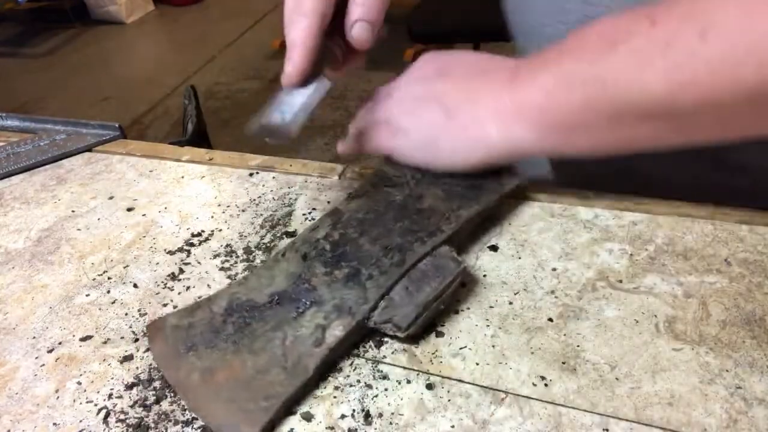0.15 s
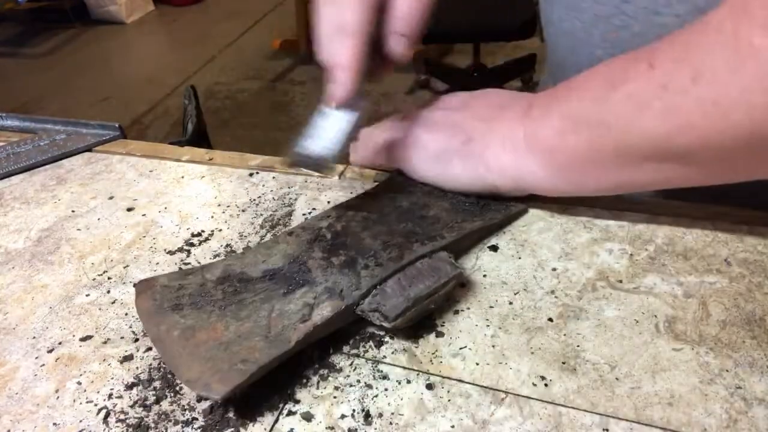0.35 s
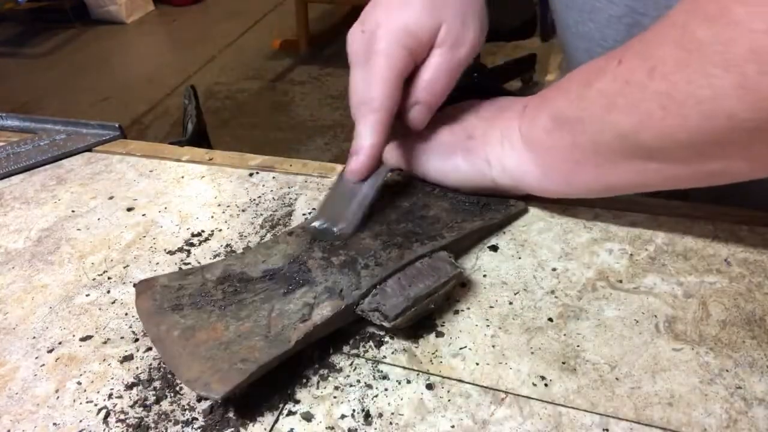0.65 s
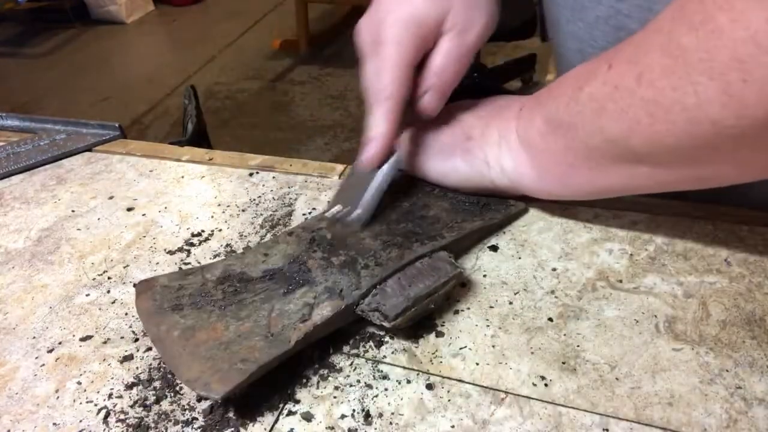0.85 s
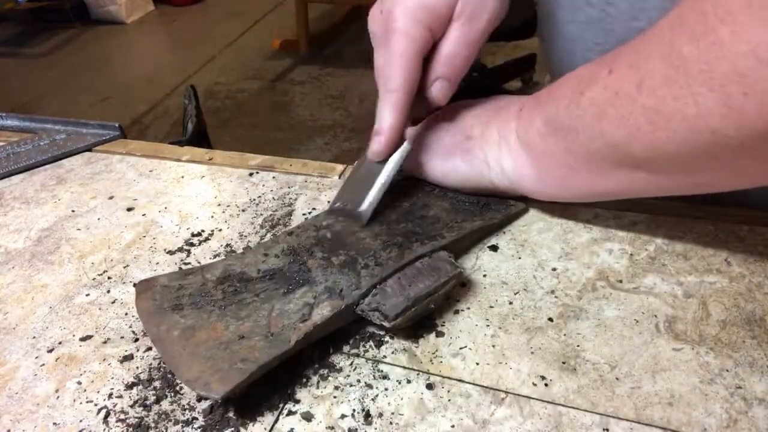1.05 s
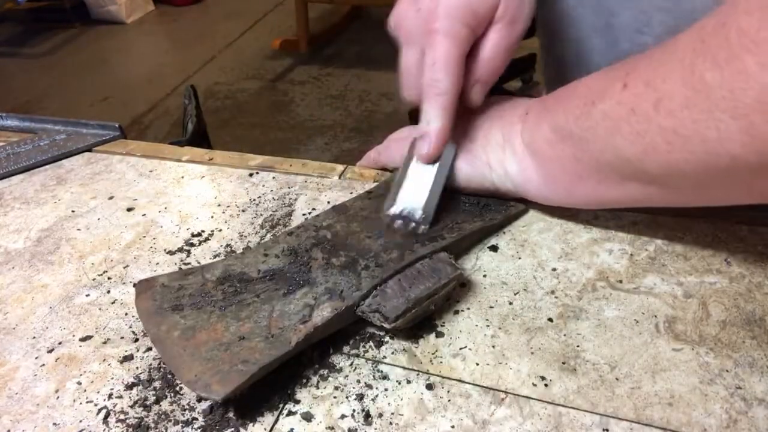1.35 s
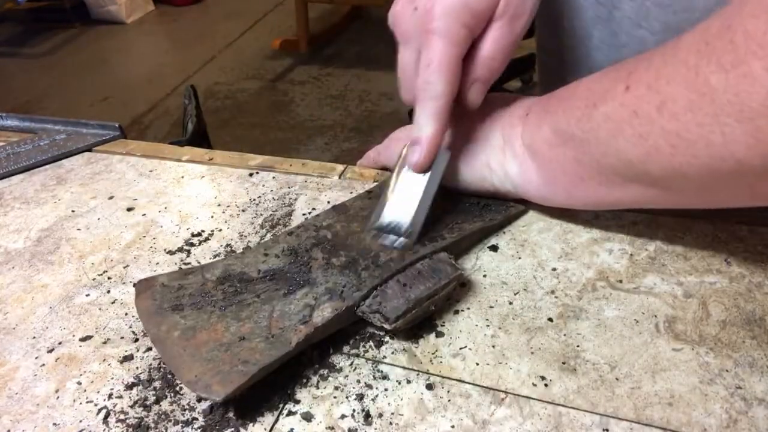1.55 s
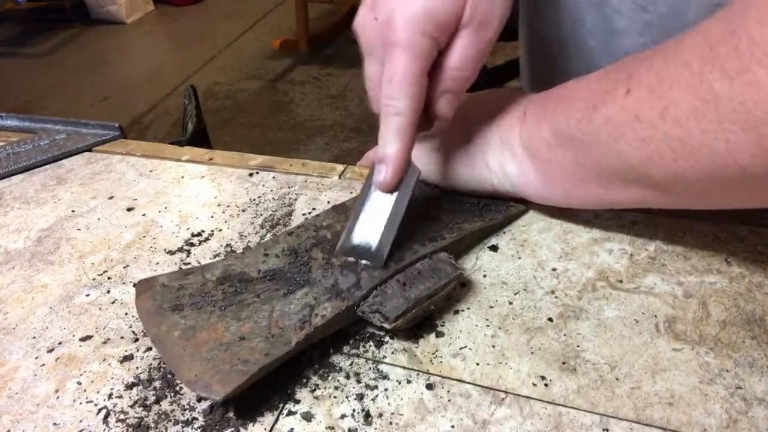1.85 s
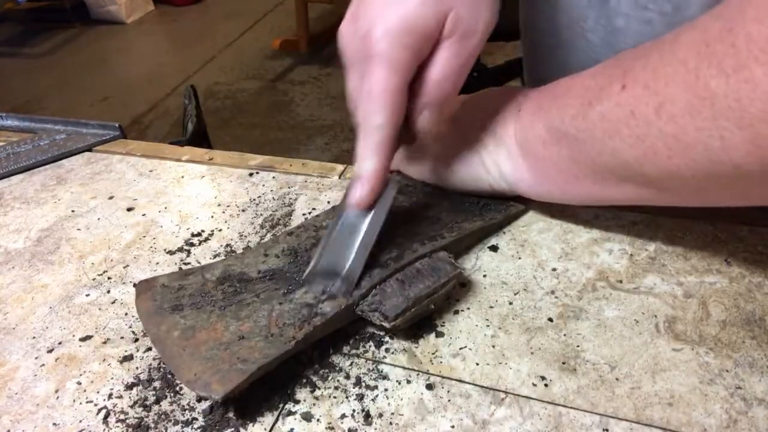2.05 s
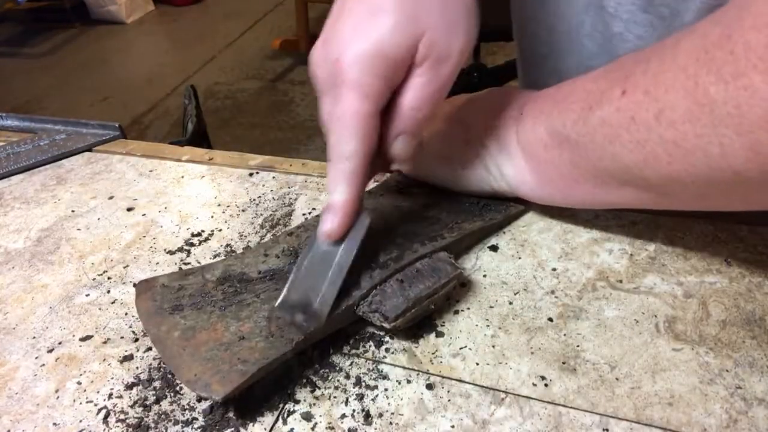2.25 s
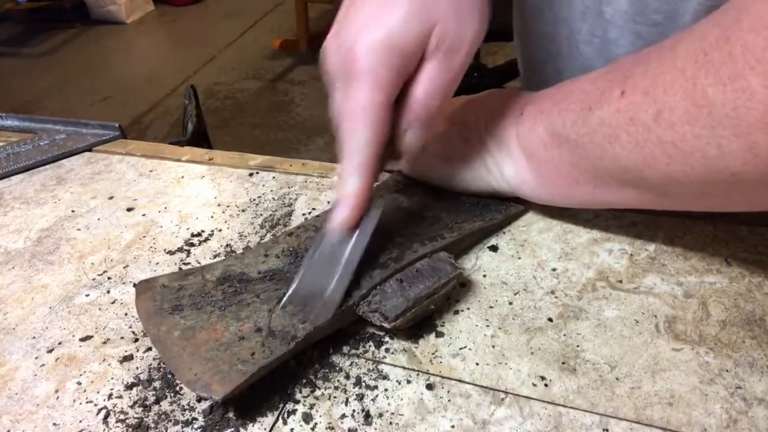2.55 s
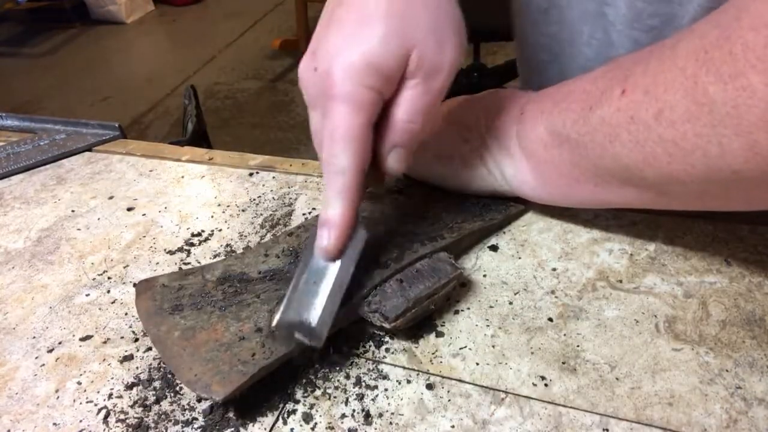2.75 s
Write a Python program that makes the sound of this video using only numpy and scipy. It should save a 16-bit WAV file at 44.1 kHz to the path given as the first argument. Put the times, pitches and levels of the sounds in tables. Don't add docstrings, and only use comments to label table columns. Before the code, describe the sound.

A steel chisel scrapes gritty hardened asphalt off an axe head in short, crunching strokes

```python
import sys
import numpy as np
from scipy import signal
from scipy.fft import rfft, irfft, next_fast_len
from scipy.io import wavfile
from scipy.ndimage import uniform_filter1d, map_coordinates

SR = 44100
rng = np.random.default_rng(int(sys.argv[2]) if len(sys.argv) > 2 else 0)


def generate_wav(sig):
    pcm = np.round(np.clip(np.atleast_2d(sig).T, -1, 1) * 32767).astype(np.int16)
    wavfile.write(sys.argv[1], SR, pcm)


def volts_from_decibels(level):
    exponent = np.asarray(level, float) / 20
    return 10 ** exponent


N = 127890
T = np.arange(N) / SR

# start_s, length_s, level_db, swell_db over the stroke, brightness_db
STROKES = [(0.217, 0.02, -58, -10, 6), (0.49, 0.0067, -77, -6, -20), (0.522, 0.074, -43, 7, -1),
           (0.68, 0.055, -51.5, 3.5, 0.5), (0.805, 0.068, -40.5, -2.5, 0.5), (0.935, 0.067, -49.5, -1, 3.5),
           (1.06, 0.081, -45, -4.5, 0.5), (1.213, 0.047, -37.5, -4.5, -1), (1.407, 0.083, -63, 14, -9),
           (1.332, 0.053, -32.5, 1.5, 2), (1.479, 0.027, -45, -6, 6.5), (1.571, 0.042, -36, 9, 0),
           (1.623, 0.027, -41, 9.5, 0), (1.72, 0.046, -52, 2.5, 4), (1.836, .025, -49, -1, 1.5),
           (1.869, 0.043, -39, -1.5, 1), (1.973, 0.056, -58, -5, 7.5), (2.094, 0.073, -40.5, 5, 1.5),
           (2.233, 0.05, -49, -18.5, 1.5), (2.269, 0.071, -57.5, 6, 7), (2.384, 0.03, -33, 1, 0),
           (2.493, 0.031, -37, 1, 2), (2.641, 0.038, -32.5, -4.5, -2.5), (2.758, 0.029, -37, 3.5, 0.5),
           (2.904, 0.028, -47, -10, 6)]
# time_s, place (0 thick poll, 1 eye, 2 thin cheek)
EDGE_PLACE = [
    (0, 0.092),
    (1.15, 0.38),
    (1.3, 1.4),
    (1.7, 0.67),
    (1.9, 1.68),
    (2.15, 1.62),
    (2.9, 1.9),
]
# pitch_hz, width_hz, level_db
POLL_MODES = [(1164, 92, -1.5), (1474, 93, 7), (1818, 51, 7), (2610, 270, 3), (3470, 160, 3),
              (3850, 120, 0), (4920, 350, -4), (5280, 39, 6), (7000, 4200, -11), (9900, 300, -8),
              (15000, 1300, -22)]
EYE_MODES = [(1196, 41, -1), (1510, 84, 7), (2405, 170, -2), (2816, 41, 6), (3092, 110, -2), (3486, 77, 10),
             (4070, 40, 8.5), (4447, 220, 6.5), (5170, 130, 1.5), (5310, 35, 9), (7140, 2130, -10),
             (9560, 470, -9.5), (11760, 1200, -21.5), (15700, 910, -14)]
CHEEK_MODES = [(1547, 150, 6), (1992, 72, 13.5), (2480, 110, 1.5), (3410, 170, 5), (3900, 190, 5.5),
               (4150, 210, 9), (4760, 310, -2.5), (5360, 46, 3.5), (7000, 4100, -11), (9040, 630, -6),
               (13100, 3600, -23)]
# freq_hz, density_db (per Hz)
CRUNCH_COLOUR = [(410, -53), (700, 2.5), (950, 1), (1420, 7.5), (2220, 0.5), (4610, 7), (5840, -28),
                 (7110, -35), (16000, -66)]
# pitch_hz, width_hz, level_db
PLANK_MODES = [(262, 54, -3.5), (444.7, 40, 1), (524.4, 78, 2), (621, 109, 0.5)]

# start_s, length_s, level_db
SONGS = [(0.604, 0.037, -65), (0.692, 0.012, -49), (1.286, .02, -82), (1.08, 0.035, -85),
         (1.75, 0.015, -53), (1.9, 0.034, -56), (2.157, 0.034, -43), (2.2, 0.048, -60),
         (2.396, 0.029, -37.5), (2.484, 0.037, -47.5), (2.669, 0.024, -39.5), (2.75, 0.046, -53.5)]
# time_s, peak_db, treble_db
TICKS = [(0.2101, -14, -7), (0.216, -32, 19), (0.2458, -43.5, 29), (0.254, -29, -2), (0.4662, -9.5, -1),
         (0.574, -29, 11), (0.619, -45, 16), (.629, -45, 16), (.691, -37, 26), (.801, -42, 23),
         (0.9445, -24.5, 9), (1.056, -33.5, 15), (0.977, -37, 20), (1.153, -50, 11), (1.178, -40.5, 25),
         (1.321, -27, -9), (1.567, -30.5, 14), (1.867, -23, -7), (2.005, -39, 2), (2.123, -20.5, 10),
         (2.628, -31, 17), (2.745, -30, -5)]
# pitch_hz, level_db, t60_s
STEEL_MODES = [(467, -16, 0.03), (1848, -12, 0.04), (3460, -12, 0.02)]
# pitch_hz, width_hz, level_db
CLINK_MODES = [(1520, 780, -0.5), (2960, 2060, -1), (4450, 960, -0.5)]
TREBLE_MODES = [(6760, 2000, -11.5)]

# time_s, level_db
DROPS = [
    (0.2137, -7.5),
    (0.219, -11),
    (.233, -26),
    (0.256, -12.5),
    (0.286, -23.5),
    (0.313, -31),
]
# pitch_hz, level_db, t60_s
THUD_MODES = [(73.4, -5, 0.26), (113.3, -2.5, 0.19), (147, -2, 0.18), (192, -8.5, 0.08), (600, -17, 0.15),
              (760, -24.5, 0.16)]
# pitch_hz, width_hz, level_db
RATTLE_MODES = [(136, 74, 2.5), (318, 150, -43), (590, 57, -10.5), (805, 630, -22), (2140, 2700, -26.5)]
# peak_s, half_length_s, level_db
SHOVES = [(0.492, 0.0086, -37.5), (0.627, 0.01, -38), (0.717, 0.0067, -36.5), (0.877, 0.021, -35),
          (0.99, 0.019, -36), (1.145, 0.051, -40.5), (1.345, 0.074, -43), (1.491, 0.018, -35.5),
          (1.636, 0.013, -32), (1.723, 0.054, -38.5), (1.891, 0.014, -31.5), (1.963, 0.081, -39),
          (2.144, 0.016, -28), (2.252, 0.045, -39.5), (2.419, 0.047, -31.5), (2.55, 0.037, -39),
          (2.68, 0.015, -28), (2.76, 0.018, -49), (2.864, 0.095, -44)]
# pitch_hz, width_hz, level_db
FRAME_MODES = [(63.9, 12.6, 4), (110.9, 20.5, -0.5), (156.4, 12, -4.5), (217, 31, -19.5), (255.7, 62, -14)]
# time_s, level_db, pitch_hz
KNOCKS = [(0.565, -44, 498), (0.804, -57, 510), (.944, -51, 600), (.977, -40.5, 589), (1.189, -45, 553),
          (1.225, -44, 485), (1.248, -38, 590), (1.342, -63, 493), (1.483, -34.5, 465), (1.591, -39, 581),
          (1.614, -40, 600), (1.635, -33.5, 418), (1.89, -53.5, 600), (2.512, -50, 517),
          (2.649, -41.5, 528)]
# time_s, level_db, pitch_hz, t60_s
JOLTS = [
    (1.423, -32, 110, 0.13),
    (1.649, -28.5, 114, .12),
    (1.918, -22, 97.8, 0.25),
    (2.007, -29, 100.4, 0.11),
    (2.152, -16.5, 104.9, 0.17),
    (2.176, -23, 84, 0.13),
    (2.461, -31, 95, .1),
    (2.696, -26.5, 62, 0.21),
]

# start_s, length_s, level_db
RUSTLES = [
    (0, 0.031, -67),
    (0.089, 0.023, -57),
]
# pitch_hz, width_hz, level_db
CLOTH_MODES = [(2040, 60, 2.5), (3500, 1000, -19), (5700, 1200, -8.5), (9500, 13000, -16.5)]
# freq_hz, t60_s
WALLS_T60 = [(100, 0.6), (1000, 0.24), (5000, 0.19), (14000, 0.22)]
# freq_hz, density_db (per Hz)
HUSH_COLOUR = [(30, -10), (110, 1.5), (230, -13), (1200, -15.5), (1900, -19.5), (3500, -17.5), (4600, -24),
               (15000, -38.5)]

STROKE_RISE_DB_S, STROKE_FALL_DB_S = 766, 826
NOISE_EVEN_S, RUMBLE_EVEN_S = 0.025, 0.06


def unit(x):
    return x / np.sqrt(np.mean(x ** 2) + 1e-20)


def along(points, hz):
    f, v = np.transpose(points)
    return np.interp(np.log(hz + 1), np.log(f + 1), v)


def wobble(rate):
    knots = rng.standard_normal(int(N * rate / SR) + 4)
    return map_coordinates(knots, [T * rate])


def filtered(x, response):
    m = next_fast_len(N + SR // 2)
    hz = np.fft.rfftfreq(m, 1 / SR)
    return irfft(rfft(x, m) * response(hz), m)[:N]


def body(modes):
    def response(f):
        total = 0
        for k, (centre, width, db) in enumerate(modes):
            damping = 1j * f * width
            total = total + (-1) ** k * volts_from_decibels(db) * damping / (centre * centre - f * f + damping)
        return total
    return response


def gate(start, length, db, rise, fall):
    climb = rise * (T - start)
    decay = fall * (start + length - T)
    return volts_from_decibels(db + np.minimum(0, np.minimum(climb, decay)))


def flaky(x, depth_db):
    z = signal.stft(x, nperseg=256)[2]
    field = uniform_filter1d(rng.standard_normal(z.shape), size=5, axis=0)
    field = uniform_filter1d(field, size=4, axis=1)
    return signal.istft(z * volts_from_decibels(depth_db * unit(field)), nperseg=256)[1][:N]


def even(x, span_s):
    span = round(span_s * SR)
    power = uniform_filter1d(uniform_filter1d(x ** 2, size=span), size=span)
    return x / np.sqrt(np.abs(power) + 1e-9)


def dying(s, t60):
    return (T > s) * volts_from_decibels(-60 * np.maximum(T - s, 0) / t60) * rng.standard_normal(N)


def ring(modes, s, db, scatter_db):
    t = np.maximum(T - s, 0)
    out = 0
    for hz, level, t60 in modes:
        strength_db = db + level + scatter_db * rng.standard_normal()
        out = out + volts_from_decibels(strength_db - 60 * t / t60) * np.sin(2 * np.pi * hz * t)
    return out


def grit():
    grains_per_s, spread_db, max_db, lumpy_db = 5000, 3.5, 8, 2
    size = volts_from_decibels(np.minimum(spread_db * rng.exponential(size=N), max_db))
    size = size * np.sign(rng.standard_normal(N))
    breaks = rng.random(N) < grains_per_s / SR
    return unit(breaks * size) * volts_from_decibels(lumpy_db * (wobble(90) + wobble(300)))


def bounce(f):
    delay_s, level_db, top_hz = 0.000668, -10.5, 4630
    return 1 + volts_from_decibels(level_db) * np.exp(-2j * np.pi * f * delay_s) / (1 + (f / top_hz) ** 4)


def scrape():
    resonant_db, flaky_db, bright_hz = 7, 2.5, 5800
    plank_poll_db, plank_cheek_db = -5.5, -12.5
    place = np.clip(np.interp(T, *np.transpose(EDGE_PLACE)), 0, 2)
    grains = grit()
    broad = unit(filtered(grains, lambda f: volts_from_decibels(along(CRUNCH_COLOUR, f)) * (f > 650)))
    tone = 0
    for k, modes in enumerate([POLL_MODES, EYE_MODES, CHEEK_MODES]):
        nearness = np.maximum(1 - np.abs(place - k), 0)
        tone = tone + nearness * unit(filtered(grains, body(modes)))
    head = filtered(broad + volts_from_decibels(resonant_db) * tone, bounce)
    head = even(flaky(head, depth_db=flaky_db), NOISE_EVEN_S)
    treble = filtered(head, lambda f: 1 / (1 + (bright_hz / (f + 1)) ** 8))

    wood = filtered(filtered(grit(), body(PLANK_MODES)), lambda f: 1 / (1 + (f / 650) ** 12))
    wood = even(wood, RUMBLE_EVEN_S)
    wood = wood * volts_from_decibels(plank_poll_db + place / 2 * (plank_cheek_db - plank_poll_db))

    out = 0
    for s, length, db, swell_db, bright_db in STROKES:
        progress = np.clip((T - s) / length, 0, 1) - 0.5
        push = gate(s, length, db + swell_db * progress, STROKE_RISE_DB_S, STROKE_FALL_DB_S)
        out = out + push * (head - treble + volts_from_decibels(bright_db) * treble + wood)
    return out


def blade_song():
    pitch_hz, width_hz, rise_db_s, fall_db_s = 5322, 22.9, 3000, 1250
    bow = sum(gate(s, length, db, rise_db_s, fall_db_s) for s, length, db in SONGS)
    phase = 2 * np.pi * (pitch_hz * T + np.cumsum(width_hz * wobble(60)) / SR)
    return bow * np.sqrt(2) * np.sin(phase) * volts_from_decibels(1.5 * wobble(90))


def steel_ticks():
    crack_db, crack_s, ring_db, tap_db, top_hz = -6.5, 0.021, -14.5, 2.5, 11000
    out = 0
    for s, db, treble_db in TICKS:
        def colour(f):
            treble = volts_from_decibels(treble_db) * body(TREBLE_MODES)(f) / (1 + 1j * f / top_hz) ** 2
            return body(CLINK_MODES)(f) + treble + volts_from_decibels(tap_db) * body(PLANK_MODES)(f)
        crack = 2 * filtered(dying(s, crack_s), colour)
        out = out + volts_from_decibels(db + crack_db) * crack + ring(STEEL_MODES, s, db + ring_db, scatter_db=0)
    return out


def head_drop():
    rattle_db, rattle_s, rattle_top_hz = -11, 0.12, 2920
    shake = sum(gate(s, 0, db + rattle_db, 4500, 60 / rattle_s) for s, db in DROPS)
    rattle = filtered(rng.standard_normal(N), lambda f: body(RATTLE_MODES)(f) / (1 + 1j * f / rattle_top_hz) ** 2)
    boom = sum(ring(THUD_MODES, s, db - 7.5, scatter_db=3) for s, db in DROPS)
    return shake * even(rattle, NOISE_EVEN_S) + boom


def bench():
    rise_db_s, fall_db_s, knock_s = 347, 391, 0.11
    force = sum(gate(s - half, 2 * half, db, rise_db_s, fall_db_s) for s, half, db in SHOVES)
    rumble = filtered(rng.standard_normal(N), body(FRAME_MODES))
    rumble = even(filtered(rumble, lambda f: 1 / (1 + (f / 320) ** 6)), RUMBLE_EVEN_S)
    knocks = sum(ring([(hz, 0, knock_s)], s, db, scatter_db=4) for s, db, hz in KNOCKS)
    jolts = sum(ring([(hz, 0, t60)], s, db, scatter_db=0.5) for s, db, hz, t60 in JOLTS)
    return force * rumble + knocks + jolts


def sleeve():
    brush = sum(gate(s, length, db, STROKE_RISE_DB_S, STROKE_FALL_DB_S) for s, length, db in RUSTLES)
    return brush * unit(filtered(grit(), body(CLOTH_MODES)))


def walls(x):
    hz, t, z = signal.stft(rng.standard_normal(SR // 2), SR, nperseg=256)
    decay = volts_from_decibels(-60 * t / along(WALLS_T60, hz)[:, None])
    tail = signal.istft(z * decay, SR, nperseg=256)[1]
    late = np.pad(x, (300, 0))
    return signal.fftconvolve(late, tail / np.linalg.norm(tail))[:N]


def hush():
    air = filtered(rng.standard_normal(N), lambda f: volts_from_decibels(along(HUSH_COLOUR, f)))
    return volts_from_decibels(-59 + 1.5 * wobble(3.2)) * unit(flaky(air, depth_db=3.0))


def scene():
    near = scrape() + blade_song() + steel_ticks() + head_drop() + bench() + sleeve()
    return (near + volts_from_decibels(-15) * walls(near) + hush())[None]


def band_limit(x):
    return signal.sosfilt(signal.butter(12, 17030, fs=SR, output="sos"), x)


def record(dry):
    low_hz, air_hz, top_hz = 40.6, 13300, 16000

    def microphone(f):
        bass_cut = (1j * f / (low_hz + 1j * f)) ** 4
        return bass_cut / (1 + 1j * f / air_hz) * (f < top_hz)
    heard = filtered(dry[0], microphone)
    return band_limit(heard[None])


dry = scene()
out = record(dry)
generate_wav(out)
```